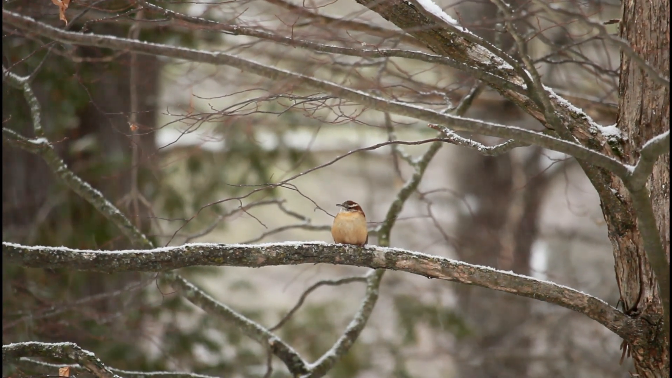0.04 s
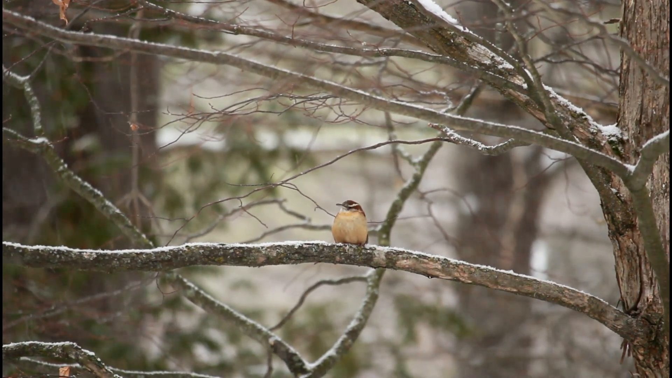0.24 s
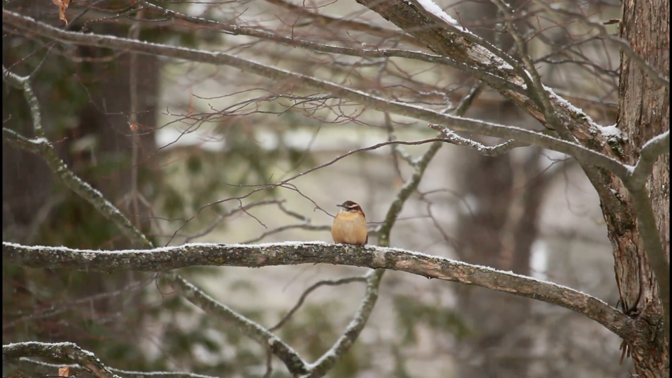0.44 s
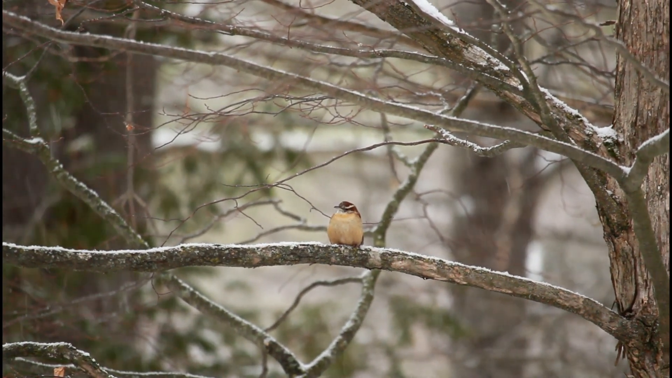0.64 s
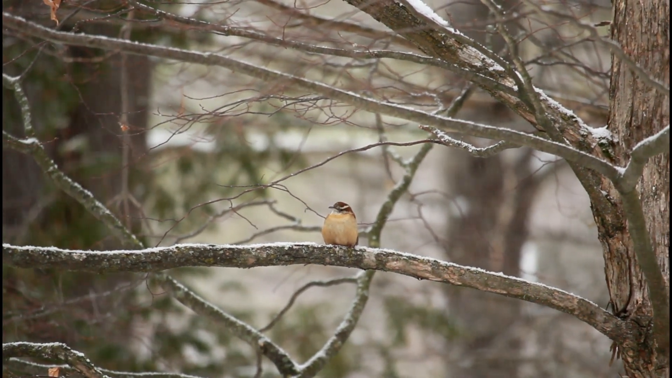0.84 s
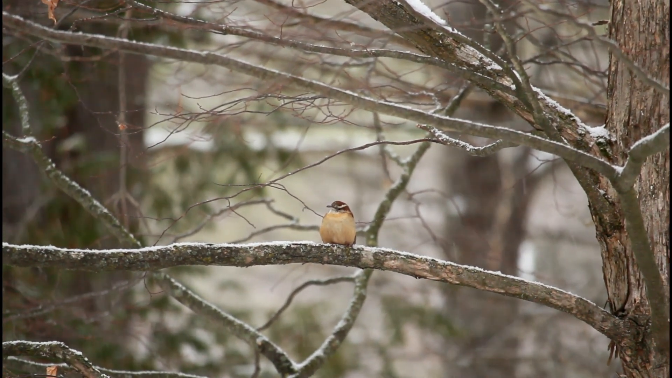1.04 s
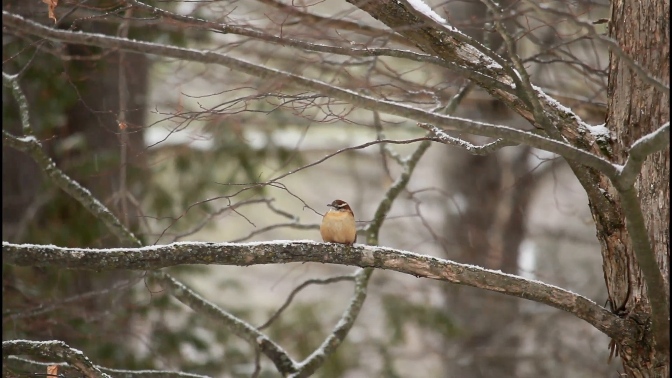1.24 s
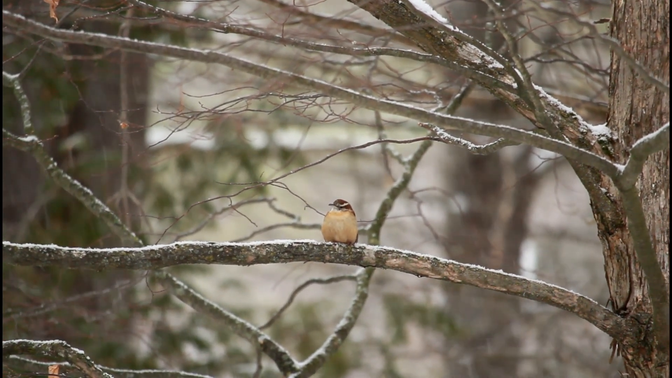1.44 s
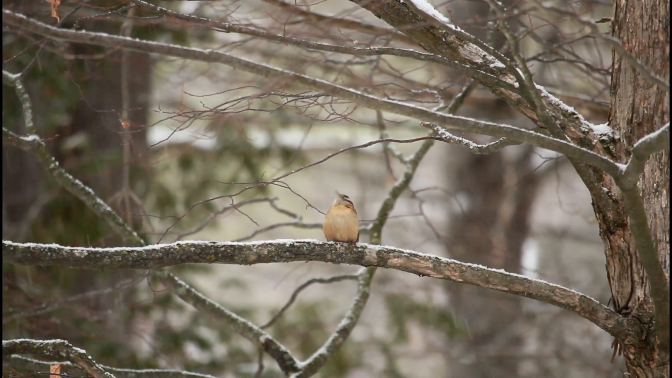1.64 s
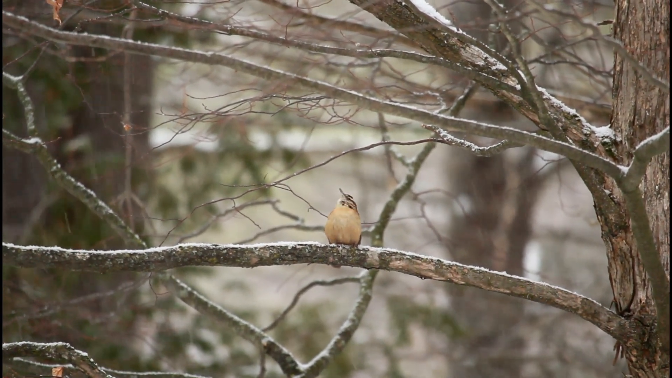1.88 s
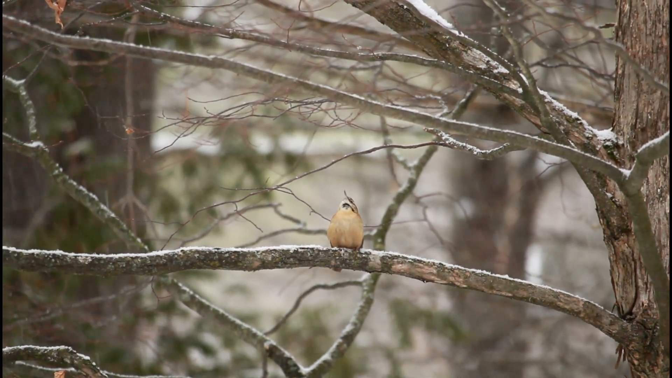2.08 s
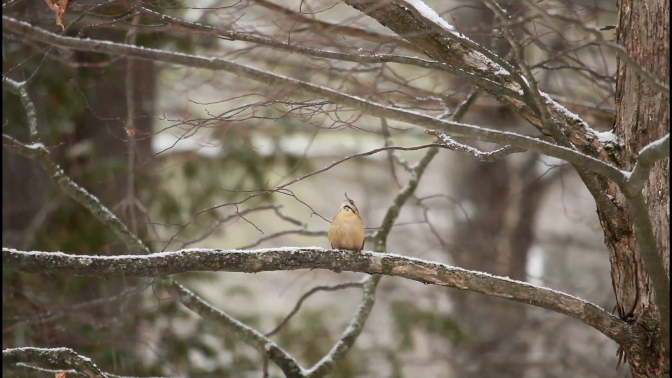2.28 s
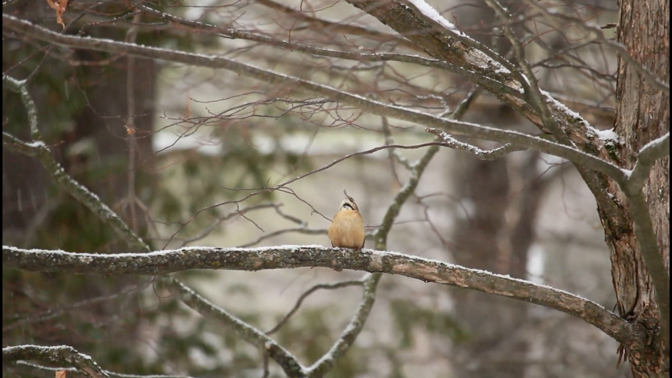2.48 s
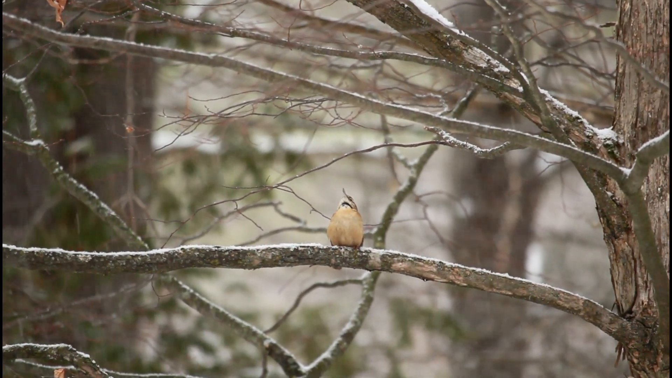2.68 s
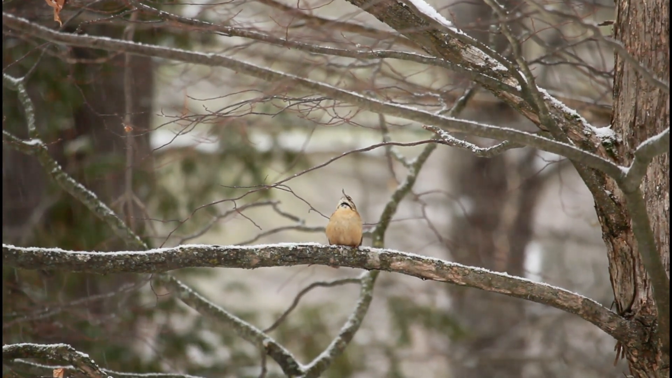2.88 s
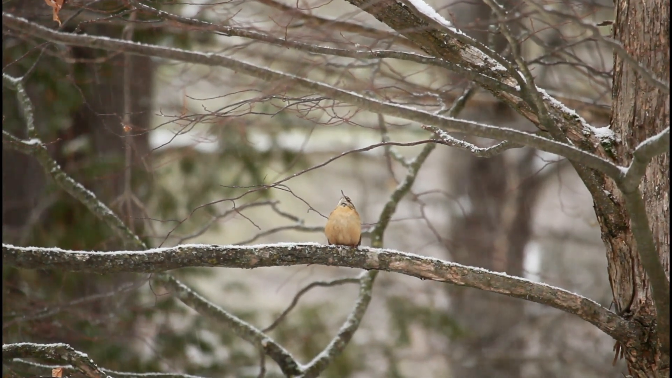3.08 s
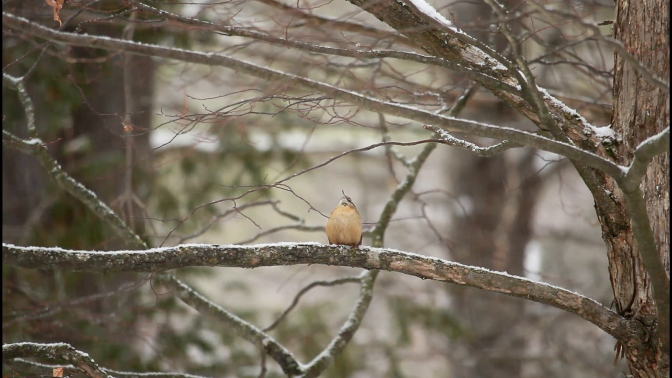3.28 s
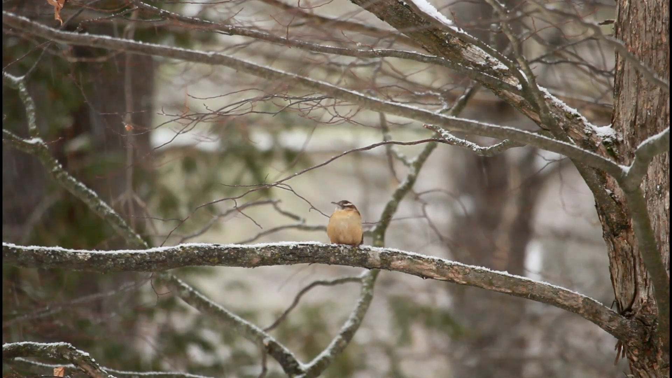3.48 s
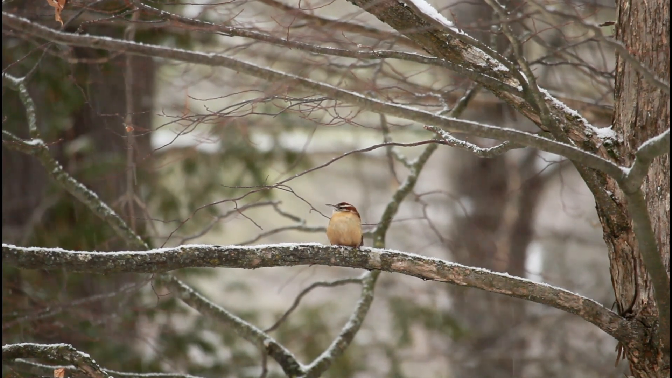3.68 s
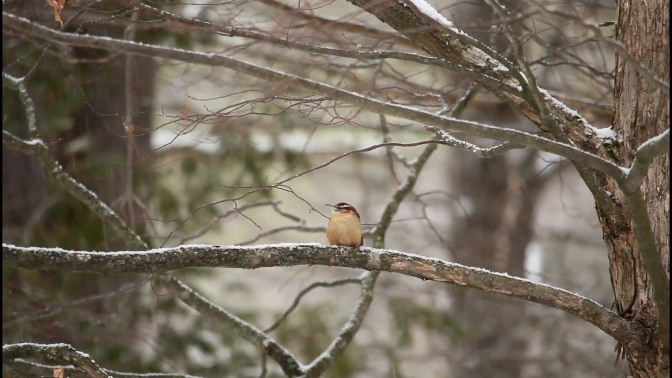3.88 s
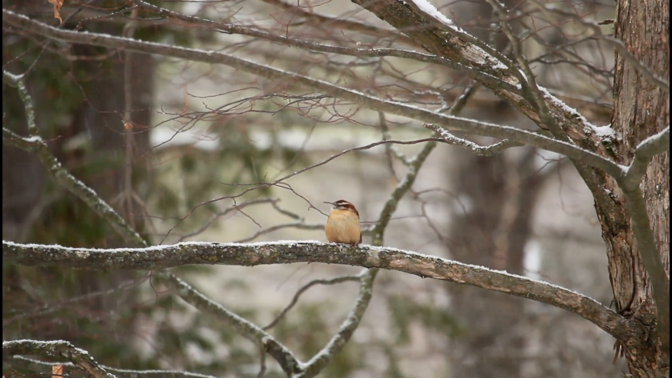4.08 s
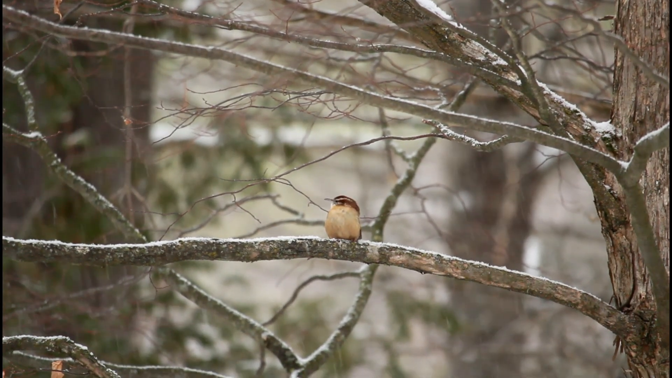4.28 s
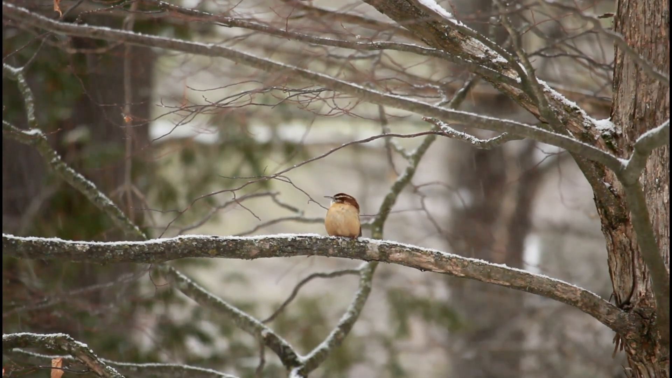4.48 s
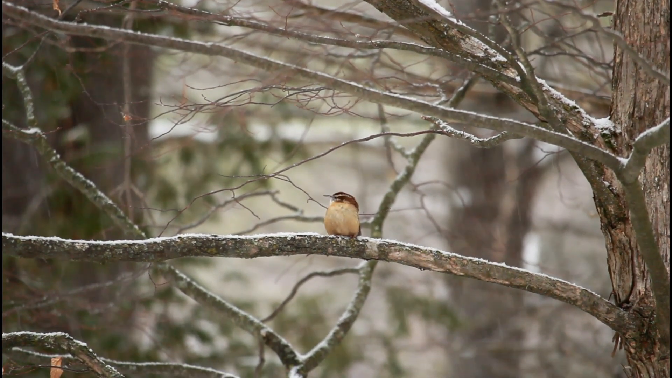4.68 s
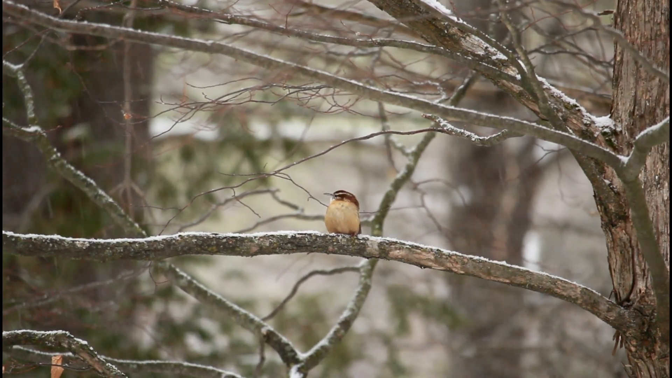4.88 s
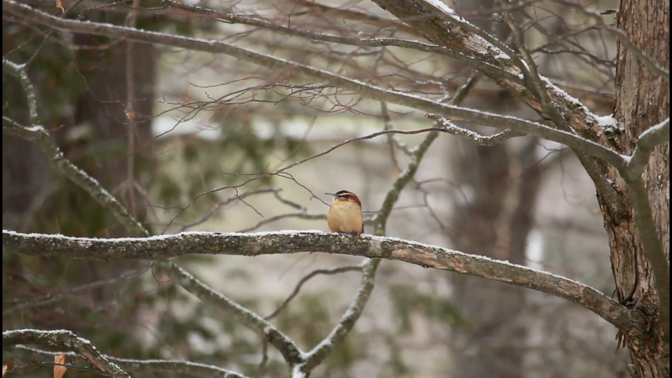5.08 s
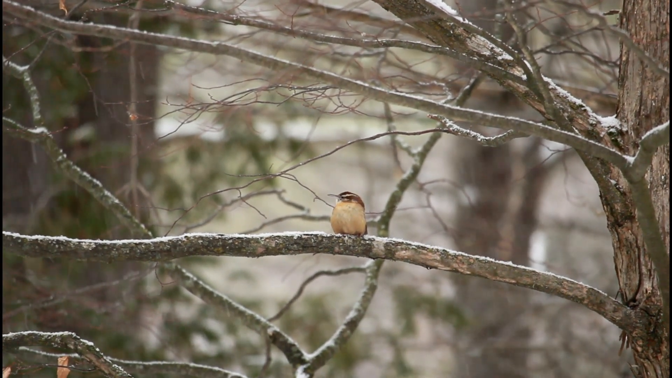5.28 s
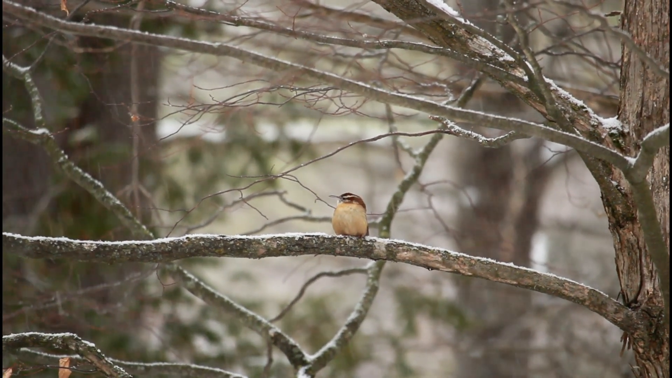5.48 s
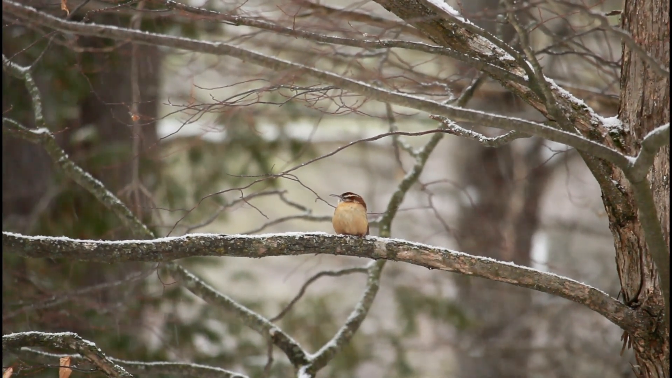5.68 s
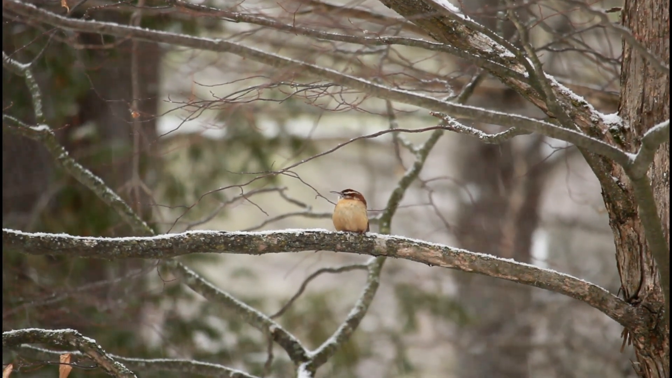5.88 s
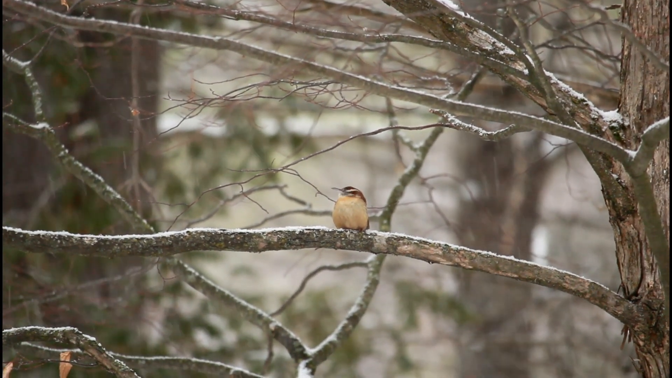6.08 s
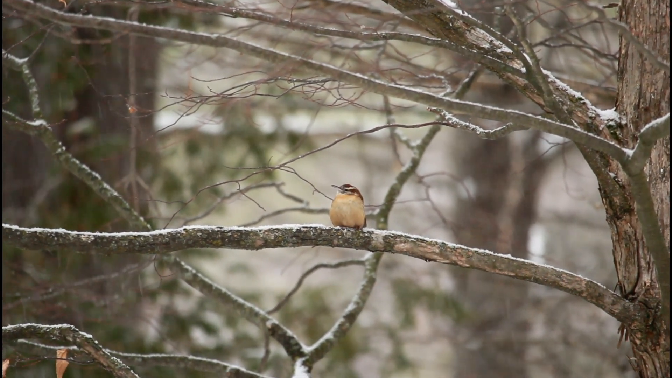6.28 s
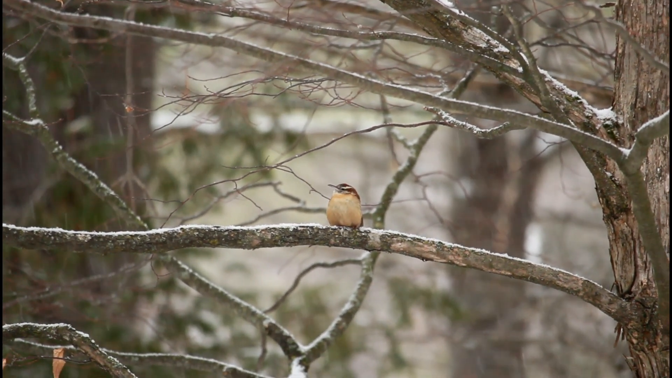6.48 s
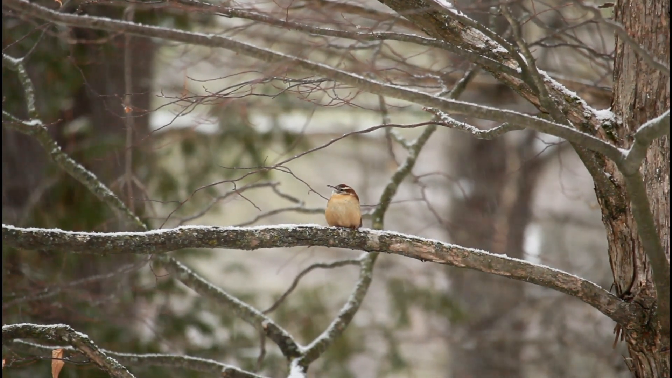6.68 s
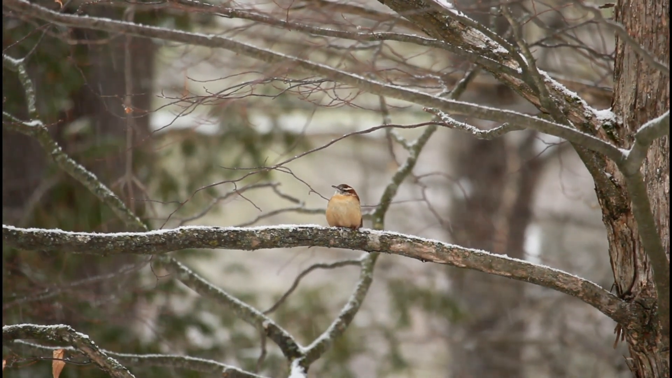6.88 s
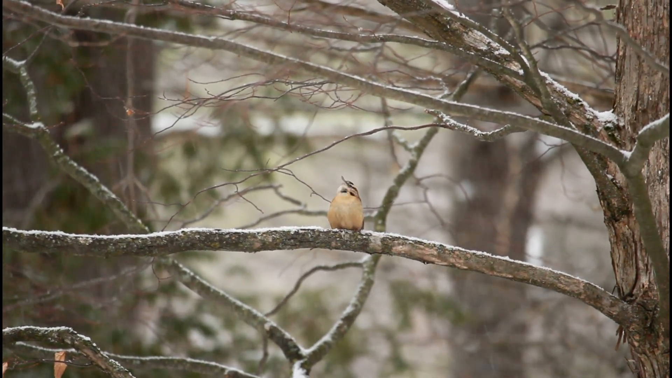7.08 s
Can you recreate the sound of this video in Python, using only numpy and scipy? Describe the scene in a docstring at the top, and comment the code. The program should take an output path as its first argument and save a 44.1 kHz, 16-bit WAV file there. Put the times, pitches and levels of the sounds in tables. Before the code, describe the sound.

Quiet winter woods with steady soft air hiss and a faint camera hum. A dull knock, then a distant crow caws twice; it caws twice more beneath a wren's loud, rapid song of four near-identical phrases, sliding whistles mixed with hoarse upward scrapes. A slap echo and woodland reverberation trail off. Thin high chips follow sparsely, with small handling ticks. The microphone is outdoors on a camera, the singer clear and fairly near.

```python
"""In bare winter woods a wren sings one burst of four quick phrases; a wall throws back a slap echo.
Its whistles are gliding sines, its scrapes sweeping buzzes. A far crow caws four times: pulses and breath
through a resonant throat. Small birds give thin chips, rising sines; a last one is the wren opening its
next song. A blurred low tone swells far away. The camera ticks (damped rings and rustles) and hums over
the hiss of the air, which is shaped noise."""
import sys
import numpy as np
from scipy import signal
from scipy.fft import rfft, irfft, next_fast_len
from scipy.io import wavfile
from scipy.ndimage import uniform_filter1d, map_coordinates

SR = 44100
rng = np.random.default_rng(int(sys.argv[2]) if len(sys.argv) > 2 else 0)


def store_pcm(level_fs):
    """Save levels as 16-bit WAV."""
    pcm = np.round(np.clip(level_fs, -1, 1) * 32767).astype(np.int16)
    wavfile.write(sys.argv[1], SR, np.atleast_2d(pcm).T)


def field_ratio(decibels):
    """Amplitude ratio for a level in dB (20 dB per decade); scalars and array-likes work."""
    return 10 ** (np.asarray(decibels, dtype=float) / 20)


N = 314874


def unit(x):
    """x scaled to an rms (average strength) of 1."""
    return x / np.sqrt(np.mean(x ** 2) + 1e-20)


def along(points, hz):
    """Reads a value at hz between (frequency [Hz], value) points on a log axis."""
    f, v = np.transpose(points)
    return np.interp(np.log(hz + 1), np.log(f + 1), v)


def course(rows):
    """First sample of a table's span, then one smoothed curve for each column after the time."""
    s, *cols = np.transpose(rows)
    first = max(round(s[0] * SR), 0)
    at = np.arange(first, min(round(s[-1] * SR), N))
    return [at[0]] + [uniform_filter1d(np.interp(at / SR, s, c), size=60) for c in cols]


def wobble(rate):
    """A smooth random curve through rate random points a second."""
    points = rng.standard_normal(int(N * rate / SR) + 4)
    return map_coordinates(points, [np.arange(N) * rate / SR])


def filtered(x, response):
    """x with each frequency multiplied by a (possibly complex) response."""
    m = next_fast_len(N + SR // 2)
    return irfft(rfft(x, m) * response(np.fft.rfftfreq(m, 1 / SR)), m)[..., :N]


def resonances(modes):
    """Response of a set of (frequency [Hz], width [Hz], level [dB]) resonances, with alternating signs."""
    def response(f):
        total = 0
        for k, (c, w, db) in enumerate(modes):
            total = total + (-1) ** k * field_ratio(db) * 1j * f * w / (c * c - f * f + 1j * f * w)
        return total
    return response


def turns(hz):
    """Phase [radians] of a tone that follows the pitch curve hz."""
    return 2 * np.pi * np.cumsum(hz) / SR


def air():
    """Faintly patchy hiss of far traffic and wind, rung by the camera body, with the hum of the camera."""
    # colour of the hiss: (frequency [Hz], relative level [dB])
    hiss_colour = [(20, -35), (45, -22), (90, -12.5), (140, -10), (341, -3), (806, -0.5), (1240, -3.5),
                   (2000, -9.5), (3500, -10.5), (6760, -15), (11000, -23.5), (15000, -35), (15700, -38)]
    # strength of the hiss before the common 7.5 dB boost: (time [s], level [dB])
    hiss_level = [(0.0, -51), (0.83, -49.5), (6.28, -50), (7.14, -51)]
    # ringing of the camera body, against the plain hiss: (frequency [Hz], width [Hz], level [dB])
    housing = [(2720, 30, 9), (2950, 13, 5.5), (3300, 48, 0.5)]
    # hum tones, before their wavering: (frequency [Hz], level [dB])
    hum_tones = [(59.2, -62), (118.4, -68)]
    z = signal.stft(rng.standard_normal(N), nperseg=512)[2]
    # neighbouring moments and frequencies grow louder or softer together
    patches = uniform_filter1d(rng.standard_normal(z.shape), size=8, axis=0)
    patches = uniform_filter1d(patches, size=8, axis=1)
    noise = signal.istft(z * field_ratio(.6 * unit(patches)), nperseg=512)[1][:N]
    hiss = unit(filtered(noise, lambda hz: field_ratio(along(hiss_colour, hz)) * (1 + abs(resonances(housing)(hz)))))
    s, db = np.transpose(hiss_level)
    t = np.arange(N) / SR
    hum = np.zeros(N)
    for hz, hum_db in hum_tones:
        strength = np.sqrt(2) * field_ratio(hum_db + 2.4 * wobble(10))
        hum += strength * np.sin(2 * np.pi * hz * t + .4 * wobble(12))
    return field_ratio(np.interp(t, s, db) + 7.5) * hiss + hum


def ticks():
    """Small knocks on the camera: each is one damped ring and a dull rustle of fading noise."""
    # (time [s], ring level at the start [dB], ring frequency [Hz], ring time to fall 60 dB [s],
    #  rustle level against the ring [dB], rustle time to fall 60 dB [s])
    knocks = [(.522, -24, 340, .06, -11, .3), (4.509, -33, 2720, .04, -14, .02),
              (6.176, -29, 950, .01, -2, .018), (6.2785, -24, 3350, .022, -4, .04)]
    rings, rustles, t = np.zeros(N), np.zeros(N), np.arange(SR // 5) / SR
    for s, db, hz, t60, rustle_db, rustle_t60 in knocks:
        start = round(s * SR)
        noise = rng.standard_normal(len(t))
        rings[start:][:len(t)] += field_ratio(db - 60 * t / t60) * np.sin(2 * np.pi * hz * t)
        build_up = 1 - np.exp(-t / (0.007 * rustle_t60))
        rustles[start:][:len(t)] += field_ratio(db + rustle_db - 60 * t / rustle_t60) * build_up * noise
    return rings + filtered(rustles, lambda hz: 1 / (1 + 1j * hz / 9000) ** 3)


def crow():
    """Uneven pulses, every second one weaker, and breath let through once a cycle, in a resonant throat."""
    # (time [s], length [s], pitch [Hz], level [dB]), both shaped further by caw_shape
    caws = [(0.824, 0.18, 565, -33), (1.176, 0.19, 567.3, -32.5), (1.774, .185, 557, -33),
            (2.16, 0.17, 571.6, -32)]
    # course of every caw: (share of its length, pitch factor, added level [dB])
    caw_shape = [(0, .9, -9), (.07, .98, -3.5), (.3, 1.015, -0.5), (.58, 0.83, -4.5), (.79, 1, -5),
                 (0.998, .95, -17)]
    # throat resonances for the pulses: (frequency [Hz], width [Hz], level [dB])
    throat = [(560, 120, -20), (1145, 200, 0), (1420, 200, -5), (1540, 220, -5), (2050, 250, -19)]
    # throat resonances for the breath, applied twice: (frequency [Hz], width [Hz], level of one pass [dB])
    breath_throat = [(1166, 263, -3), (1553, 95, -2.5), (1960, 460, -10.5)]
    pitch, level_db, age = np.full(N, 550.), np.full(N, -120.), np.zeros(N)
    for s, length, caw_hz, caw_db in caws:
        at, hz, db = course([(s + u * length, caw_hz * f, caw_db + d) for u, f, d in caw_shape])
        span = slice(at, at + len(hz))
        pitch[span], level_db[span], age[span] = hz, db, np.linspace(0, 1, len(hz))
    phase = turns(pitch * (1 + .02 * wobble(100)))
    pulses = sum(np.cos(k * phase) for k in range(1, 6))
    pulses = pulses * (1 + .5 * np.cos(phase / 2)) * field_ratio(1.8 * wobble(70))
    effort = np.clip((level_db + 37) / 7, 0, 1)  # full effort sings a clearer tone
    tone = unit(filtered(pulses, resonances(throat))) * (.3 + effort)
    gated = (1 + np.cos(phase)) * rng.standard_normal(N)
    breath = unit(filtered(gated, lambda hz: resonances(breath_throat)(hz) ** 2))
    # a second voice slides down during each caw
    sag_hz = (1100 - 380 * age) * (1 + 0.026 * wobble(80))
    sag = np.sin(turns(sag_hz)) * np.sin(np.pi * age) * wobble(50)
    voice = tone + 0.79 * breath + 0.32 * sag
    # distance takes the treble
    return filtered(field_ratio(level_db) * voice, lambda hz: 1 / (1 + (hz / 3000) ** 4))


def notes():
    """Start sample, pitch, level and overtone level of every whistled note; each kind has its own shape."""
    # shapes of two kinds: (share of the length, share of the way from first to last pitch, added level [dB])
    rise_shape = [(0, 0, -18), (.3, 0.22, -3.5), (.75, .8, -0.5), (1, 1, -33)]
    droop_shape = [(0, 0.065, -22), (.22, 0.011, -0.5), (.58, .35, -4.5), (.82, .75, -6), (1, 1, -26)]
    # notes of these kinds: (time [s], length [s], first pitch [Hz], last pitch [Hz], level before shape [dB])
    rises = [(1.798, 0.023, 2100, 2530, -17), (2.199, 0.025, 2020, 2485, -15.5),
             (2.575, 0.028, 2280, 2465, -10.5), (2.949, 0.038, 2142, 2440, -15)]
    droops = [(1.901, 0.044, 1536, 1340, -22.5), (2.303, 0.046, 1662, 1406, -21.5),
              (2.682, 0.0516, 1632, 1350, -21)]
    # short whistles that swell and fade: (time [s], length [s], share of the length at which it is loudest,
    #  first pitch [Hz], pitch from the loudest point on [Hz], loudest level [dB])
    holds = [(1.729, .018, 0.45, 5702, 5474, -19.5), (1.832, .029, 0.39, 2900, 2794, -8.5),
             (2.229, 0.027, 0.6, 2647, 2790, -5), (2.614, .03, 0.31, 2720, 2806, -6.5),
             (2.995, .026, .64, 2523, 2795, -8.5)]
    # up and steeply down, catching at the top:
    # (time from the top [s], pitch before factor [Hz], added level [dB])
    arch_shape = [(-.026, 2067, -41), (-.018, 2267, -8), (-.01, 2400, 0.5), (-.002, 2674, -0.5),
                  (.002, 2660, -3), (.007, 2494, 2), (.013, 2260, -3), (.02, 1854, -12.5),
                  (.029, 1686, -15)]
    # (time of the top [s], pitch factor, level before shape [dB], level added to the opening [dB])
    arches = [(2.03, .98, -13, -3.5), (2.414, 0.99, -11.5, -3), (2.799, 0.99, -11.5, -4)]
    # (time [s], climb [s], fall [s], top pitch [Hz], last pitch [Hz], level before beak and edges [dB])
    slides = [(1.744, 0.002, 0.041, 5160, 2960, -12), (2.136, .004, 0.043, 4250, 2850, -8),
              (2.519, .008, .037, 3860, 2860, -6.5), (2.904, 0.019, .016, 4294, 3120, -12)]
    # the half-open beak favours the middle of a slide: (frequency [Hz], added level [dB])
    slide_beak = [(2850, -8), (3350, -1.5), (3800, -3), (4350, -7.5), (5300, -29)]
    for shape, rows in ((rise_shape, rises), (droop_shape, droops)):
        for s, length, first_hz, last_hz, db in rows:
            path = [(s + u * length, first_hz + way * (last_hz - first_hz), db + d) for u, way, d in shape]
            yield *course(path), 0
    for s, length, top, first_hz, last_hz, db in holds:
        shares = np.array([0, 0.19, top, 1 - .2, 1])  # start, attack, loudest, release, end
        levels = db + np.array([-29, -4.5, 0, -5, -29])
        pitches = np.interp(shares, [0, top], [first_hz, last_hz])
        yield *course(np.c_[s + shares * length, pitches, levels]), -7
    for s, factor, db, opening_db in arches:
        yield *course([(s + t, f * factor, db + d + opening_db * (t < -.012)) for t, f, d in arch_shape]), 0
    climb_hz_per_s, attack_s, release_s, edge_db = 25500, 0.0076, 0.0067, -16
    for s, climb, fall, top_hz, last_hz, db in slides:
        # halfway down, the pitch lies below the straight path: by 9 % of the drop if the fall lasts 44 ms
        sag_hz = .09 * (top_hz - last_hz) * fall / .044
        at, hz = course([(s, top_hz - climb * climb_hz_per_s),
                         (s + climb, top_hz),
                         (s + climb + fall / 2, (top_hz + last_hz) / 2 - sag_hz),
                         (s + climb + fall, last_hz),
                         (s + climb + fall + release_s, last_hz)])
        t = np.arange(len(hz)) / SR
        edges = np.clip(1 - t / attack_s, 0, 1) + np.clip(1 - (t[-1] - t) / release_s, 0, 1)
        yield at, hz, db + along(slide_beak, hz) + edge_db * edges, -7


def whistles():
    """The wren's clear notes: gliding sines with faint overtones, purer the higher they lie."""
    # overtones of a 2500 Hz whistle, before the note's own overtone level: (multiple of the pitch, level [dB])
    overtones = [(2, -27.5), (3, -36), (4, -47.5), (5, -50), (6, -48)]
    out = np.zeros(N)
    for at, hz, db, over_db in notes():
        edge_db = over_db - 9 * np.log2(hz / 2500)
        phase = turns(hz)
        tone = np.sin(phase) + sum(field_ratio(o_db + edge_db) * np.sin(k * phase) for k, o_db in overtones)
        fade = signal.windows.tukey(len(hz), 260 / len(hz))  # soft ends, 130 samples each
        out[at:at + len(hz)] += np.sqrt(2) * field_ratio(db) * fade * tone
    return out


def drone():
    """A far low tone, blurred in pitch and level by the distance."""
    # the swell: (time [s], level before the blur [dB])
    swell = [(1.75, -58), (2.3, -51.5), (2.55, -46.5), (2.9, -45), (3.3, -47), (3.8, -54), (3.95, -50),
             (4.4, -61)]
    out = np.zeros(N)
    at, db = course(swell)
    span = slice(at, at + len(db))
    blur = unit(0.57 + wobble(30) + 0.73 * wobble(110))[span]
    hz = 358.7 * (1 + 0.0182 * wobble(15)[span])
    out[span] = np.sqrt(2) * field_ratio(db) * blur * np.sin(turns(hz))
    return out


def scrapes():
    """The wren's hoarse buzz sweeps up; each overtone flares as it crosses the throat resonance."""
    # the harsh upward rip: (time from its loudest [s], pitch before factor [Hz], added level [dB])
    rip = [(-.012, 1258, -28.5), (-.008, 1443, -7.5), (-.0045, 1694, -7.5), (0, 2487, -0.5),
           (.004, 3187, -2.5), (.008, 3850, -4), (0.015, 3974, -13.5), (0.02, 3954, -17.5)]
    # (time of the loudest [s], pitch factor, level before shape [dB], level added to the held end [dB])
    rips = [(2.111, 1.11, -7.5, -6.5), (2.496, 0.98, -8, 5), (2.886, .99, -8.5, 6)]
    # what the open beak passes: (frequency [Hz], level [dB])
    open_beak = [(1200, -21.5), (2500, -16), (3400, -13.5), (4000, -3.5), (5000, 2), (6000, -9),
                 (7500, -26.5), (12000, -40.5), (16000, -57)]
    out, shake = np.zeros(N), wobble(900)
    for s, factor, level_db, end_db in rips:
        at, hz, db = course([(s + t, f * factor, d + level_db + end_db * (t > .005)) for t, f, d in rip])
        hoarse = 0.14 * np.clip(1 - hz / 3600, 0, 1) * shake[at:at + len(hz)]  # the slack start wavers most
        phase = turns(hz * (1 + hoarse))
        buzz = np.zeros(len(hz))
        for k in range(1, 10):
            buzz += field_ratio(along(open_beak, k * hz) - 0.5 * (k - 2)) * np.sin(k * phase)
        out[at:at + len(hz)] += np.sqrt(2) * field_ratio(db) * buzz
    return out


def chips():
    """Thin rising calls of small birds; the last, at 7.127 s, is the wren opening its next song.
    Each is a sine that climbs fast and then levels off."""
    # (time [s], length [s], first pitch [Hz], last pitch [Hz], level at the middle [dB])
    calls = [(3.49, .035, 6700, 7300, -52), (3.548, .03, 6260, 6970, -49), (4.235, .03, 6800, 7400, -50.5),
             (4.465, 0.054, 7960, 8100, -56), (4.788, 0.059, 7100, 7700, -44),
             (5.191, 0.058, 6400, 7350, -34.5), (6.335, 0.038, 7560, 7770, -48.5),
             (7.127, 0.018, 4840, 5640, -34)]
    out = np.zeros(N + SR)
    for s, length, first_hz, last_hz, db in calls:
        u = np.linspace(0, 1, round(length * SR))
        tone = np.sin(turns(first_hz + (last_hz - first_hz) * np.sin(u * np.pi / 2)))
        out[round(s * SR):][:len(u)] += np.sqrt(2) * field_ratio(db) * np.sin(np.pi * u) ** 1.15 * tone
    return out[:N]


def echoes(x):
    """Single reflections, duller than the direct sound, and the late slap off a wall."""
    # ground and near trunks, before the treble loss: (delay [s], level [dB])
    reflections = [(.00095, -14.5), (.0094, -11.5), (.0147, -19), (0.0184, -26), (0.0212, -33),
                   (0.0253, -31)]
    # what the wall returns: (frequency [Hz], level [dB])
    wall = [(1200, -17), (2200, -9.5), (2550, -7.5), (2800, -12), (3200, -11.5), (4200, -24), (6000, -22)]

    def late(hz, s):
        return np.exp(-2j * np.pi * hz * s)

    def response(hz):
        early = sum(field_ratio(db) * late(hz, s) for s, db in reflections) / (1 + (hz / 5000) ** 2)
        return early + field_ratio(along(wall, hz)) * late(hz, .1235)  # the slap comes 0.1235 s late
    return filtered(x, response)


def twigs(x, t60):
    """Quick dense scattering off the nearest branches, strongest near 2.6 kHz, falling 60 dB in t60 s."""
    t = np.arange(SR // 4) / SR
    tail = field_ratio(-60 * t / t60) * (1 - np.exp(-t / 0.0017)) * rng.standard_normal(len(t))
    bright = filtered(x, lambda hz: (hz / 3000) ** 0.31 / (1 + (hz / 6000) ** 2))
    return signal.fftconvolve(bright, tail / np.linalg.norm(tail))[:N]


def woods(x, onset):
    """Scattering among the trunks: builds over onset seconds, each frequency dying at its own speed."""
    # (frequency [Hz], time to fall 60 dB [s])
    decay = [(500, 0.85), (1500, 1.22), (3000, 0.84), (6000, 0.48), (12000, 0.35)]
    hz, t, z = signal.stft(rng.standard_normal(3 * SR // 2), SR, nperseg=256)
    envelope = field_ratio(-60 * t / along(decay, hz)[:, None]) * (1 - np.exp(-t / onset))
    tail = signal.istft(z * envelope, SR, nperseg=256)[1]
    return signal.fftconvolve(x, tail / np.linalg.norm(tail))[:N]


def scene():
    """Burst, chips and caws each come with sound scattered by the woods; the burst also has echoes."""
    burst, thin, far = whistles() + scrapes(), chips(), crow()
    close = field_ratio(-7) * twigs(burst, t60=0.39)
    song = burst + echoes(burst) + close + field_ratio(-16.0) * woods(burst, onset=0.023)
    calls = thin + field_ratio(-12) * woods(thin, onset=0.0055)
    distant = field_ratio(5.5) * far + field_ratio(-2.5) * woods(far, onset=0.034)
    return (song + calls + distant + drone() + ticks() + air())[None]


def band_limit(x):
    """A steep low-pass at the top of the band."""
    return signal.sosfilt(signal.butter(12, 15730, fs=SR, output="sos"), x)


def record(dry):
    """The input stage rounds off the loudest peaks and keeps nothing above its band limit."""
    soft = dry / (1 + abs(dry / 1.6) ** 4) ** (1 / 4)
    mix = filtered(soft, lambda hz: hz < 15730)
    return band_limit(mix)


dry = scene()
out = record(dry)
store_pcm(out)
```